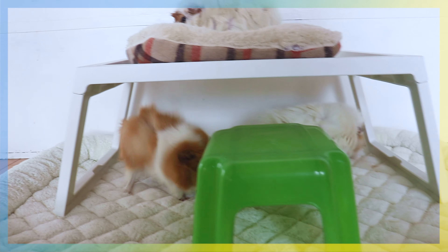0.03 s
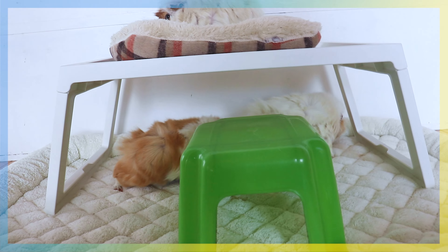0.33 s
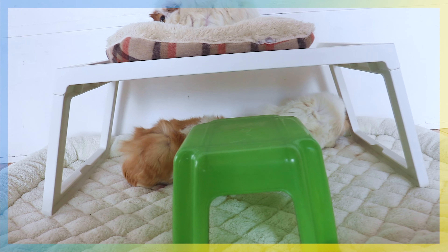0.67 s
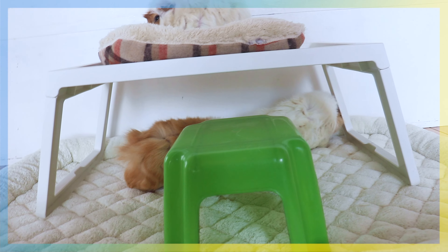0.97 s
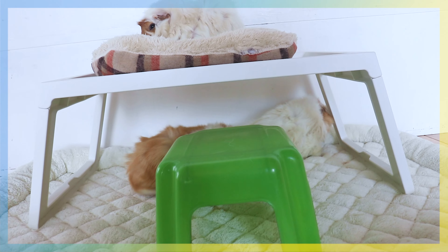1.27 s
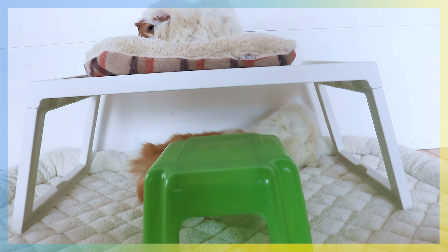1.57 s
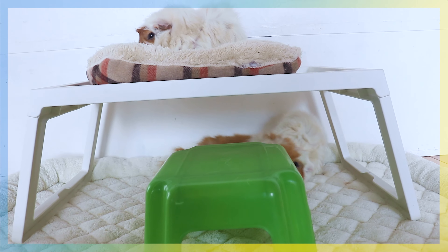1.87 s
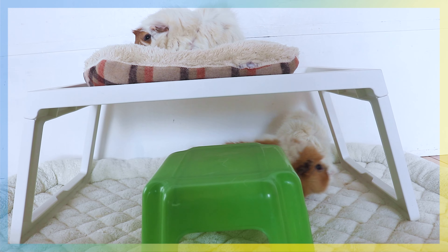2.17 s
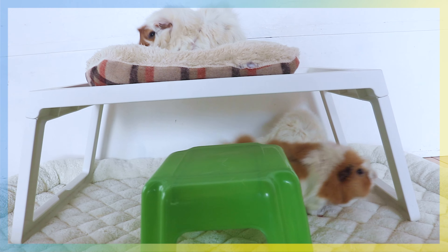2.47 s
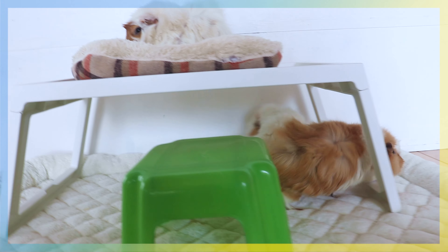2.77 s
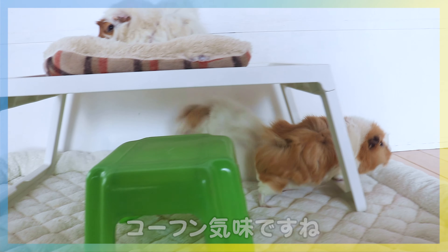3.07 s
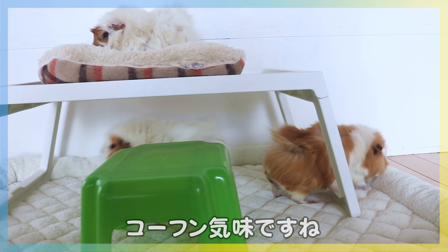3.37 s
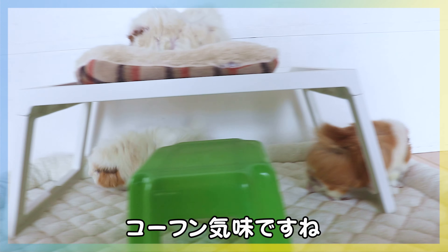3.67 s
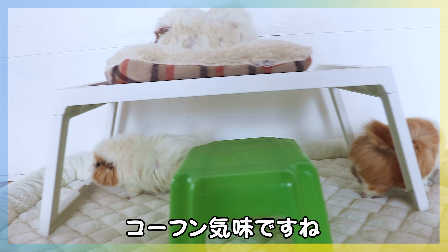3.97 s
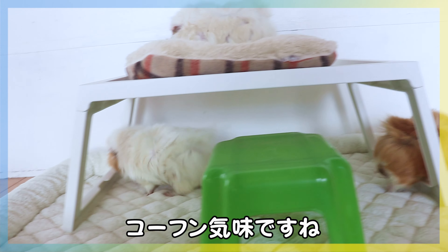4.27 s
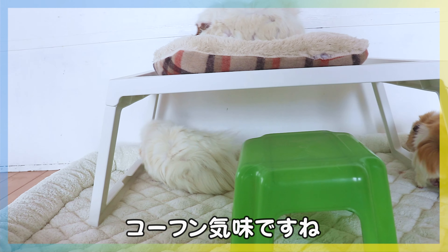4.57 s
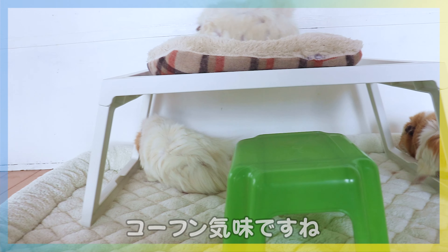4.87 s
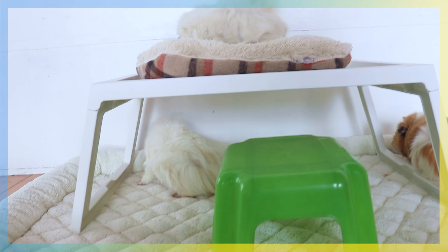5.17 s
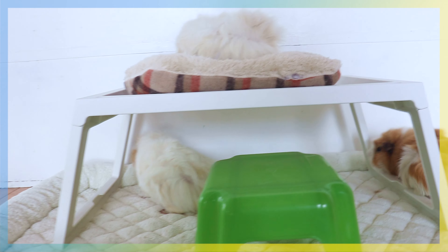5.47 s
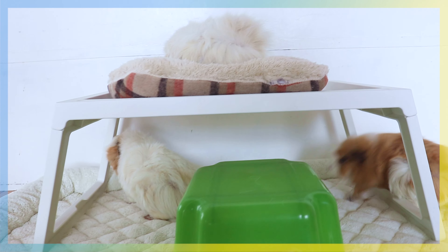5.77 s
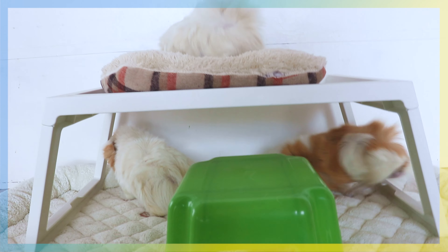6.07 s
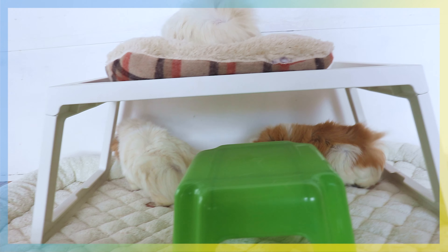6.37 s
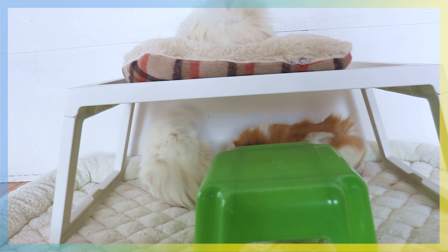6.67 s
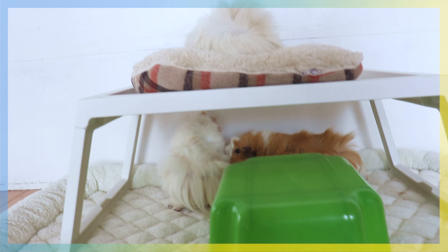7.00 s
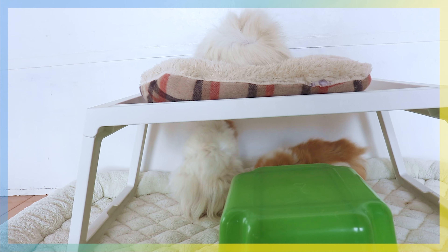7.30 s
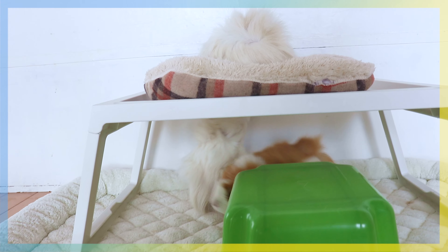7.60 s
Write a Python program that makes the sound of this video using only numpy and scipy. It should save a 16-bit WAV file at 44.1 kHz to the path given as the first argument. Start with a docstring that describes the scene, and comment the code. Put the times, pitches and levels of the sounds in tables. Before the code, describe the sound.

From the start, a guinea pig makes a low, throaty rumble of rapid pulses. It fades at about 1.3 seconds, and a second, softer bout runs from 1.6 to 3 seconds. Then the guinea pigs begin short grunts and quick chuts, joined from about 3.8 seconds by hoarse rasps and thin whimpers. A few brief, shrill squeaks come between 4.6 and 7 seconds. Claws and teeth click sharply on furniture, loudest at about 4.4 and 6.1 seconds, with a lighter click at 5. Paws thud softly on a padded mat, mostly between 5 and 6 seconds. From about 6.7 seconds the chatter grows louder, and at 7.6 one animal scrambles close by with quick scratches, clicks and soft bumps, until the end near 8 seconds. The room sounds small and bare, with a short echo and faint steady background noise.

```python
"""A train of low throaty pulses: a guinea pig rumbles on a quilted mat in a small bare room.
Then the animals break into quick chuts, grunts, thin whimpers, squeaks and hoarse rasps.
Vibrating folds voice the calls through the throat; in the rasps, air rattles past them.
Claws and teeth click on the furniture, paws thud softly on the mat, and one animal scrambles close by."""
import sys
import numpy as np
from scipy import signal
from scipy.fft import rfft, irfft
from scipy.io import wavfile
from scipy.ndimage import map_coordinates

SR = 44100
rng = np.random.default_rng(int(sys.argv[2]) if len(sys.argv) > 2 else 0)


def int16_out(signal):
    """Quantize to a 16-bit WAV file."""
    q = np.round(np.clip(np.atleast_2d(signal).T, -1, 1) * 32767)
    wavfile.write(sys.argv[1], SR, q.astype(np.int16))


N = 345744
TIME = np.arange(N) / SR


def from_db(db):
    """Decibels to gain."""
    return 10 ** (np.asarray(db) / 20)


def rms_one(x):
    """Scale to rms 1."""
    return x / np.sqrt(np.mean(x ** 2) + 1e-20)


def add(out, start_s, sound):
    """Mix a sound in, trimmed to the scene."""
    at = int(round(start_s * SR))
    sound = sound[max(-at, 0):max(N - at, 0)]
    out[max(at, 0):max(at, 0) + len(sound)] += sound


def band(x, low_hz, high_hz, order=2):
    """Butterworth band-pass."""
    sos = signal.butter(order, [low_hz, min(high_hz, .45 * SR)], "band", fs=SR, output="sos")
    return signal.sosfilt(sos, x)


def wobble(size, rate_hz):
    """Smooth random curve, spread about 1."""
    at = np.arange(size) * rate_hz / SR
    return map_coordinates(rng.standard_normal(int(at[-1]) + 4), [at + 1], order=3, mode="mirror")


def bell(t, sigma_s):
    """Gaussian swell, height 1."""
    return np.exp(-.5 * (t / sigma_s) ** 2)


def resonate(x, modes):
    """Parallel resonances (f/Hz, width/Hz, gain/dB), alternating in sign."""
    out = 0
    for k, (hz, width_hz, db) in enumerate(modes):
        r = np.exp(-np.pi * width_hz / SR)
        b = np.array([1, 0, -1]) * (1 - r * r) / 2
        a = [1, -2 * r * np.cos(2 * np.pi * hz / SR), r * r]
        out = out + (-1) ** k * from_db(db) * signal.lfilter(b, a, x)
    return out


def swing(peak_s, hz, db, sigma_s):
    """Something soft answers a push with a few cycles."""
    out, t = np.zeros(N), np.arange(-4 * sigma_s, 4 * sigma_s, 1 / SR)
    phase = 2 * np.pi * np.cumsum(hz * (1 + .06 * wobble(len(t), 35))) / SR
    add(out, peak_s + t[0], from_db(db) * bell(t, sigma_s) * np.sin(phase))
    return out


def glide(start_s, end_s, hz, slide_hz, scoop, attack_s, jitter, release_s=.0096, overhang_s=.004):
    """Onset, pitch and envelope of a call; scoop lifts both ends by a share of hz (negative: an arch)."""
    length_s = max(end_s - start_s, .01)
    t = np.arange(-overhang_s, length_s + overhang_s, 1 / SR)
    along = 2 * np.clip(t / length_s, 0, 1) - 1
    pitch = hz * (1 + scoop * along ** 2) + slide_hz * along / 2
    pitch *= 1 + jitter * wobble(len(t), 200)
    opening = np.clip((t - t[0]) / attack_s, 0, 1) * np.clip((t[-1] - t) / release_s, 0, 1)
    return start_s + t[0], pitch, np.sin(np.pi / 2 * opening) ** 2


# throat resonances: f/Hz, width/Hz, gain/dB
THROAT_MODES = [(450, 160, 18.5), (865, 83, 14.5), (1190, 290, 12.5), (1670, 400, -16.5), (1980, 1200, 3.5),
                (2740, 1200, 2.5)]


def throat_gain(hz, cutoff_hz=2900):
    """The throat passes its resonances and closes steeply at the top."""
    power = sum(from_db(db) ** 2 / (1 + (2 * (hz - centre_hz) / width_hz) ** 2)
                for centre_hz, width_hz, db in THROAT_MODES)
    return np.sqrt(power / (1 + (hz / cutoff_hz) ** 28))


def voice(pitch, rough, split_hz=1400, flutter_hz=260, top_hz=4200):
    """Vibrating folds: fundamental, lower and upper overtones, each rms 1; rough shakes each overtone."""
    phase = 2 * np.pi * np.cumsum(pitch) / SR
    centre_hz, size = np.median(pitch), len(pitch)
    lower, upper = np.zeros(size), np.zeros(size)
    for k in range(2, max(int(top_hz / centre_hz), 3) + 1):
        shake = (wobble(size, flutter_hz) + 1j * wobble(size, flutter_hz)) / np.sqrt(2)
        # mouth and head move: each overtone swells on its own
        gain = throat_gain(k * pitch) * from_db(3 * wobble(size, 45))
        partial = gain * np.real((np.sqrt(1 - rough ** 2) + rough * shake) * np.exp(1j * k * phase))
        if k == 2 or k * centre_hz < split_hz:
            lower += partial
        else:
            upper += partial
    return np.sqrt(2) * np.sin(phase), rms_one(lower), rms_one(upper)


# rumble bouts: start/s, end/s, first pulse gap/s, gap growth per pulse/s
RUMBLE_BOUTS = [(0.0, 1.33, .0574, .00046), (1.562, 2.94, .0577, 0.00032)]


def pulse_times():
    """Each bout slows as it goes on."""
    for at_s, end_s, gap_s, growth_s in RUMBLE_BOUTS:
        while at_s < end_s:
            yield at_s
            at_s += gap_s
            gap_s += growth_s


# course of the rumble: t/s, pitch/Hz, effort/dB, upper overtones/dB
RUMBLE_COURSE = [(0, 279.6, -21, -40), (.18, 269, -25.5, -60.5), (.38, 288, -23, -58.5),
                 (.74, 289.4, -26, -60), (.92, 279.4, -36, -68), (1.099, 305.2, -33, -60),
                 (1.37, 288, -43.5, -63), (1.57, 286, -49, -65), (1.689, 290.7, -33.5, -59.5),
                 (1.98, 262.8, -34, -62), (2.22, 267, -32, -56), (2.42, 269, -28.5, -45.5),
                 (2.631, 288, -22, -39), (2.73, 268.6, -32.5, -63.5), (2.92, 282, -31.5, -50)]


def rumble(lead_db=-9, rise=.0604, shimmer=.23, overtones_db=-26, overtones_follow=.61):
    """Each pulse of the folds starts softly, swells as its pitch lifts, and is cut off."""
    out, t = np.zeros(N), np.arange(-.04, .04, 1 / SR)
    gate = np.clip((t + .026) / .005, 0, 1) * np.clip((.019 - t) / .008, 0, 1)
    soft_start, open_throat = bell(t + .016, .0052), bell(t + .0034, .0098)
    lift = rise * np.tanh(t / .0042)
    times_s, *controls = np.transpose(RUMBLE_COURSE)
    for at_s in pulse_times():
        hz, effort_db, high_db = (np.interp(at_s, times_s, control) for control in controls)
        pitch = hz * (1 + rng.normal(0, .0252) + lift + .032 * wobble(len(t), 216.6))
        low, mid, high = voice(pitch, rough=.59, split_hz=1500)
        swell = bell(t, .0065) + from_db(lead_db + rng.normal(0, 1.3)) * soft_start
        strength = from_db(effort_db + rng.normal(0, 1))
        throb = strength * swell * low * (1 + shimmer * wobble(len(t), 374.6))
        mid_db = overtones_db + overtones_follow * effort_db
        buzz = open_throat * (from_db(mid_db) * mid + from_db(high_db) * high)
        add(out, at_s + t[0], gate * (throb + buzz))
    # a small body radiates little below its fundamental
    return signal.sosfilt(signal.butter(4, 190, "high", fs=SR, output="sos"), out)


# room noise spectrum: f/Hz, relative density/dB
AIR_SPECTRUM = [(12, -46), (20, 22), (37, -19), (60, -2), (210, -9.5), (270, -1.5), (328, -5.5), (499, -10),
                (825, -7.5), (1220, -17), (1760, -25.5), (2750, -26), (4060, -32), (14700, -40),
                (16000, -34)]


def still_air(level_db=-50.13):
    """Steady faint noise of the room."""
    hz, db = np.transpose(AIR_SPECTRUM)
    bins_hz = np.fft.rfftfreq(N, 1 / SR)
    shape = from_db(np.interp(np.log(bins_hz + 1), np.log(hz), db))
    return from_db(level_db) * rms_one(irfft(rfft(rng.standard_normal(N)) * shape, N))


# hoarse calls: start/s, end/s, lower throat band/dB, upper throat band/dB
RASP_CALLS = [(1.222, 1.359, -63, -65.5), (3.77, 4.073, -47, -64), (4.189, 4.406, -47.5, -49),
              (4.678, 4.709, -49.5, -49), (4.974, 5.105, -44.5, -42), (5.292, 5.39, -38.5, -62.5),
              (5.424, 5.597, -50.5, -43.5), (5.743, 5.841, -43, -50), (5.958, 6.135, -46, -50.5),
              (6.351, 6.579, -55.5, -54.5), (6.708, 6.959, -40.5, -40.5)]


def rasps(rattle_db=4, hiss_db=17, fold_hz=300, arch=.16, jitter=.012, voiced_db=4):
    """Air rattles through half-closed folds and rings the throat; hard calls hiss past the teeth."""
    out = np.zeros(N)
    for start_s, end_s, lower_db, upper_db in RASP_CALLS:
        size = int((end_s - start_s) * SR)
        pitch = fold_hz * (1 + arch * np.sin(np.linspace(0, np.pi, size)) + jitter * wobble(size, 150))
        cycle_count = np.floor(np.cumsum(pitch) / SR)
        beats = rms_one(np.diff(cycle_count, prepend=0))
        air = rng.standard_normal(size) + from_db(voiced_db) * beats
        air *= from_db(rattle_db * wobble(size, 240))
        throaty = band(air, 764, 3045, order=8)
        lower = from_db(lower_db) * rms_one(resonate(throaty, [(1136, 200, 3), (1737, 310, -8)]))
        upper = from_db(upper_db) * rms_one(resonate(throaty, [(2304, 150, 2.5), (3000, 1900, 3.5)]))
        hiss = from_db(hiss_db + lower_db + upper_db) * rms_one(band(air, 4900, 7600, order=4))
        add(out, start_s, signal.windows.tukey(size, .6) * (lower + upper + hiss))
    return out


# deep sways: t/s, peak/dB
SWAY_PEAKS = [(1.25, -22), (1.634, -14.5), (5.46, -25)]


def sways(hz=15.94, sigma_s=.033):
    """Very deep swings, more felt than heard."""
    return sum(swing(at_s, hz, db, sigma_s) for at_s, db in SWAY_PEAKS)


# chuts: start/s, end/s, pitch/Hz, slide/Hz, fundamental/dB, lower overtones/dB, upper overtones/dB
CHUT_CALLS = [(1.514, 1.568, 436, -102, -46, -46.5, -60), (3.331, 3.394, 495.6, -26, -39.5, -50.5, -50),
              (3.456, 3.474, 601, 150, -45.5, -60, -69), (4.145, 4.22, 535, 56, -54, -36, -47.5),
              (4.333, 4.419, 572, -170, -73, -47.5, -56.5), (4.556, 4.634, 530.6, -86, -44.5, -44, -43.5),
              (4.672, 4.725, 508, -200, -59, -51.5, -54.5), (4.9, 4.978, 520.5, -81, -42, -51.5, -41.5),
              (4.994, 5.056, 684, -350, -60.5, -55.5, -43.5), (5.328, 5.378, 484.6, 33.5, -34, -40, -45),
              (5.408, 5.466, 566, 125, -40, -44, -47), (5.493, 5.552, 571, -6, -38.5, -46.5, -53),
              (5.765, 5.828, 533.6, -63.5, -46.5, -39.5, -39), (5.975, 6.043, 506, -21.5, -41.5, -47, -37),
              (6.09, 6.123, 316, -44.5, -44.5, -42.5, -37), (6.237, 6.296, 397, -21.5, -36, -49.5, -55.5),
              (6.677, 6.733, 574.6, -220, -35.5, -33.5, -42), (6.791, 6.853, 590, 53, -34.5, -33, -48.5),
              (6.875, 6.948, 665, 69, -33, -31, -40), (7.103, 7.158, 569.5, -200, -37, -32.5, -43),
              (7.218, 7.281, 494, 150.5, -43.5, -35.5, -38.5), (7.318, 7.366, 501, 199, -41, -36.5, -36.5),
              (7.517, 7.591, 536.6, 187, -40.5, -29.5, -37.5), (7.626, 7.654, 533, -187, -33, -22.5, -36.5),
              (7.77, 7.839, 556, 15, -33.5, -19.5, -32)]


def chuts(scoop=.19, scoop_ref_hz=536.8, push_skew=1.5, fade_db=7, breath_db=-19):
    """Short voiced calls, dipping in pitch; the fundamental leads, overtones swell with the late push."""
    out = np.zeros(N)
    for start_s, end_s, hz, slide_hz, low_db, mid_db, high_db in CHUT_CALLS:
        bend = scoop * (hz / scoop_ref_hz) ** 2
        onset_s, pitch, envelope = glide(start_s, end_s, hz, slide_hz, bend, attack_s=.014, jitter=.015)
        low, mid, high = voice(pitch, rough=.38)
        along = np.linspace(0, 1, len(pitch))
        push = np.sin(np.pi * along ** push_skew)
        # air leaks through the folds once a cycle
        leak = rng.standard_normal(len(pitch)) * (1 + low / 2)
        breath = from_db(breath_db) * rms_one(band(leak, 900, 2900, order=7))
        fundamental = from_db(low_db - fade_db * (along - .5)) * low
        lower = from_db(mid_db) * rms_one(1 + push) * mid
        upper = from_db(high_db) * rms_one(.35 + push) * (high + breath)
        add(out, onset_s, envelope * (fundamental + lower + upper))
    return out


# furniture resonances: f/Hz, width/Hz, gain/dB
FURNITURE_MODES = [(1833, 190, 6.5), (2340, 370, 5.5), (3050, 240, 4), (3570, 300, 5.5), (4230, 630, -1),
                   (5200, 170, 3), (5630, 320, -0.5), (7200, 7900, -3), (12300, 5100, -18)]


def contact(t60_s, centre_hz, band_ratio=1.524, crack_db=-8, snap=7.4):
    """One snap and a burst of tiny slips ring the furniture; peak 1."""
    t = np.arange(0, .15, 1 / SR)
    slips = np.tanh(rng.standard_normal(len(t))) * from_db(-60 * t / t60_s)
    slips[0] = snap * np.exp(-t60_s / .0044)   # the briefest contacts are nearly all snap
    ringing = resonate(slips, FURNITURE_MODES) + from_db(crack_db) * slips
    sound = band(ringing, centre_hz / band_ratio, centre_hz * band_ratio)
    return sound / np.abs(sound).max()


# clicks: t/s, peak/dB, T60/s, band centre/Hz, knock re click/dB
CLICK_HITS = [(2.808, -39, 0.03, 5700, -20), (4.436, -9.5, .016, 5830, -2), (4.451, -17.5, .06, 4700, -6.5),
              (5.0099, -22, 0.02, 5270, -9), (5.019, -28, 0.016, 5450, -11),
              (6.1297, -10.5, 0.0011, 5780, -17), (7.63, -23, .007, 8050, -1),
              (7.727, -24.5, 0.063, 3340, -8)]


def clicks(knock_lag_s=.002, knock_t60_s=.012, knock_hz=2150):
    """Claws and teeth hit the furniture: a bright click, then at once a duller knock."""
    out = np.zeros(N)
    for at_s, db, t60_s, hz, knock_db in CLICK_HITS:
        add(out, at_s, from_db(db) * contact(t60_s, hz))
        add(out, at_s + knock_lag_s, from_db(db + knock_db) * contact(knock_t60_s, knock_hz))
    return out


# grunts: start/s, end/s, pitch/Hz, slide/Hz, lower overtones/dB
GRUNT_CALLS = [(3.167, 3.19, 457, -100, -40.5), (3.569, 3.604, 350, 126, -39),
               (3.642, 3.709, 330, 21.5, -41.5), (3.747, 3.822, 435, 59, -38.5),
               (6.328, 6.39, 519.5, 160.5, -31), (6.424, 6.482, 259.5, -3.5, -40)]


def grunts(scoop=.035, fundamental_db=-6, upper_db=-20):
    """Slack folds, mouth nearly shut: low, rough, dull calls."""
    out = np.zeros(N)
    for start_s, end_s, hz, slide_hz, db in GRUNT_CALLS:
        onset_s, pitch, envelope = glide(start_s, end_s, hz, slide_hz, scoop, attack_s=.024, jitter=.031)
        low, mid, high = voice(pitch, rough=.88)
        grunt = from_db(fundamental_db) * low + mid + from_db(upper_db) * high
        add(out, onset_s, from_db(db) * envelope * grunt)
    return out


# paw landings: t/s, peak/dB, sigma/s
PAW_LANDINGS = [(3.178, -39, .025), (5.024, -29, 0.018), (5.558, -35.5, 0.028), (5.686, -25, 0.0164),
                (5.761, -32, 0.033), (7.766, -46.5, 0.025)]


def paw_thuds(mat_hz=71.6, overtone_hz=133.3, overtone_db=-15.5):
    """The padded mat answers each paw with a low swing and one overtone."""
    return sum(swing(at_s, mat_hz, db, sigma_s) + swing(at_s, overtone_hz, db + overtone_db, sigma_s)
               for at_s, db, sigma_s in PAW_LANDINGS)


def whistles(calls, scoop, scoop_ref_hz, overtone_db=-20, shrill_hz=2500, tremble_db=2, breath_db=-19):
    """Thin tones in fluttering air; higher calls bend more, and the shrillest gain an overtone."""
    out = np.zeros(N)
    for start_s, end_s, hz, slide_hz, db in calls:
        bend = scoop * hz / scoop_ref_hz
        onset_s, pitch, envelope = glide(start_s, end_s, hz, slide_hz, bend, attack_s=.008, jitter=.019)
        phase = 2 * np.pi * np.cumsum(pitch) / SR
        breath = from_db(breath_db) * wobble(len(pitch), 900) * np.cos(phase)
        overtone = from_db(overtone_db) * (pitch / shrill_hz) ** 6 * np.sin(2 * phase)
        gain = from_db(db + tremble_db * wobble(len(pitch), 156))
        add(out, onset_s, envelope * gain * rms_one(np.sin(phase) + breath + overtone))
    return out


# whimpers: start/s, end/s, pitch/Hz, slide/Hz, level/dB
WHIMPER_CALLS = [(4.035, 4.078, 850, 266, -33.5), (4.221, 4.267, 810, 174, -32.5),
                 (5.072, 5.112, 801, -62, -34.5), (5.293, 5.332, 777, -73, -32.5),
                 (5.483, 5.51, 772, 28, -35.5), (6.161, 6.203, 791, 138, -33.5),
                 (6.33, 6.39, 835, 389, -35), (6.4, 6.441, 1115, 108, -47.5),
                 (6.509, 6.554, 987, -450, -45.5), (6.936, 6.983, 960, -100, -36.5),
                 (7.377, 7.423, 834, 260, -29.5), (7.581, 7.61, 797, -46, -29.5),
                 (7.736, 7.763, 851.6, 369, -27.5)]


def whimpers():
    """Nearly pure whistles with a scooped pitch."""
    return whistles(WHIMPER_CALLS, scoop=.147, scoop_ref_hz=850)


# bumps: t/s, peak/dB
BODY_BUMPS = [(4.348, -47.5), (4.704, -43.5), (5.061, -34.5), (5.396, -45.5), (6.042, -43), (7.598, -45),
              (7.658, -39), (7.743, -34.5), (7.804, -33)]


def bumps(hz=288, sigma_s=.019):
    """Bodies push softly against the furniture."""
    return sum(swing(at_s, hz, db, sigma_s) for at_s, db in BODY_BUMPS)


# squeaks: start/s, end/s, pitch/Hz, slide/Hz, level/dB
SQUEAK_CALLS = [(4.651, 4.681, 2057, -600, -39.5), (5.841, 5.859, 1877, -200, -29.5),
                (6.056, 6.078, 1824, -50, -33.5), (6.738, 6.792, 2572, -100, -35),
                (6.851, 6.88, 1310, -480, -28.5)]


def squeaks():
    """Shrill whistles with an arched pitch."""
    return whistles(SQUEAK_CALLS, scoop=-.24, scoop_ref_hz=1890)


def scuffle(start_s=7.63, patter_db=-45, grains_per_s=600, paw_db=16, stroke_gap_s=.049, stroke_db=-28):
    """An animal scrambles close by: quick uneven claw strokes over scratches and soft paw bumps."""
    grains = (rng.random(N) < grains_per_s / SR) * rng.standard_normal(N)
    grains += .086 * rng.standard_normal(N)
    scratches = band(grains, 1700, 20000, order=1)
    paws = from_db(paw_db) * band(grains, 100, 500)
    out = from_db(patter_db) * rms_one(scratches + paws) * np.clip((TIME - start_s) / .0033, 0, 1)
    for at_s in np.arange(start_s, N / SR, stroke_gap_s):
        lag_s = rng.uniform(0, .008)
        gain = from_db(stroke_db + rng.normal(0, 1.9))
        add(out, at_s + lag_s, gain * contact(t60_s=.077, centre_hz=11000))
    return out


# wall and floor echoes: delay/s, level/dB (wet_db / 2 is added)
ROOM_ECHOES = [(.0047, -38), (0.0107, -49), (0.016, -7.5), (0.024, -29)]


def room(x, wet_db, t60_s=.25, treble_t60_s=.23):
    """A few near echoes, then a diffuse tail that dies sooner in the treble."""
    t = np.arange(0, .5, 1 / SR)
    noise = rng.standard_normal(len(t))
    body = band(noise, 150, 3100) * from_db(-60 * t / t60_s)
    treble = band(noise[::-1], 3600, 13000) * from_db(-60 * t / treble_t60_s)
    tail = (body + treble) * np.clip((t - .004) / .009, 0, 1)
    response = from_db(wet_db) * tail / np.sqrt(np.sum(tail ** 2))
    for delay_s, db in ROOM_ECHOES:
        response[int(delay_s * SR)] += from_db(db + wet_db / 2)
    return x + signal.fftconvolve(x, response)[:N]


def scene():
    """All animals in one room, mono."""
    rumbling = room(rumble(), wet_db=-14.5)
    thin_calls = whimpers() + squeaks()
    calls = room(chuts() + grunts() + rasps(), wet_db=-8) + room(thin_calls, wet_db=-9)
    movement = room(clicks() + scuffle(), wet_db=-11.5) + paw_thuds() + bumps() + sways()
    return (rumbling + calls + movement + still_air())[None]


def record(dry):
    """The sound fades in over its first 4 ms; microphone: 22 Hz high-pass, steep 15750 Hz low-pass."""
    dry = dry * np.clip(TIME / .004, 0, 1)
    dry = signal.sosfilt(signal.butter(2, 22, "high", fs=SR, output="sos"), dry)
    return signal.sosfilt(signal.ellip(10, .1, 80, 15750, fs=SR, output="sos"), dry)


dry = scene()
out = record(dry)
int16_out(out)
```